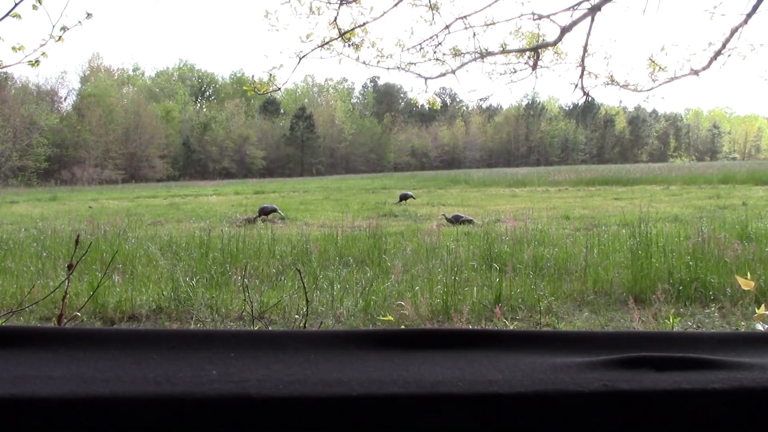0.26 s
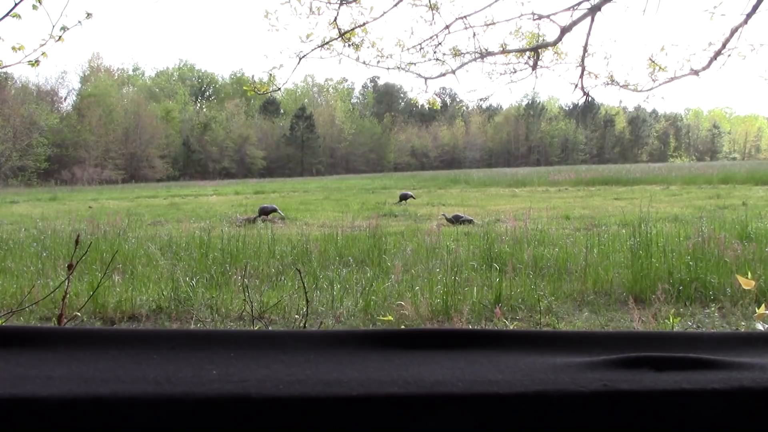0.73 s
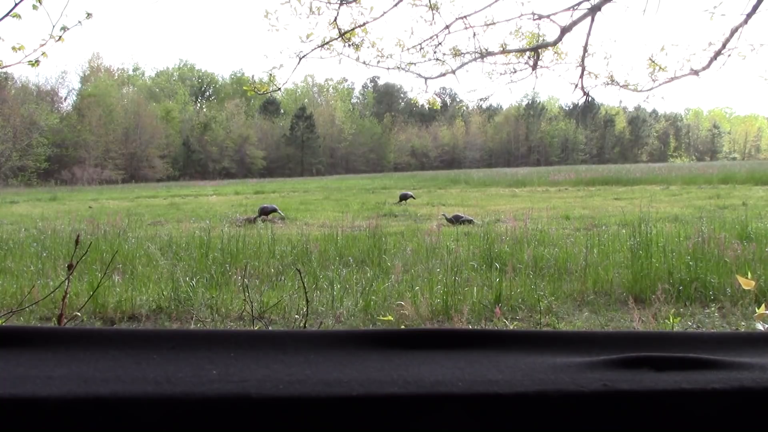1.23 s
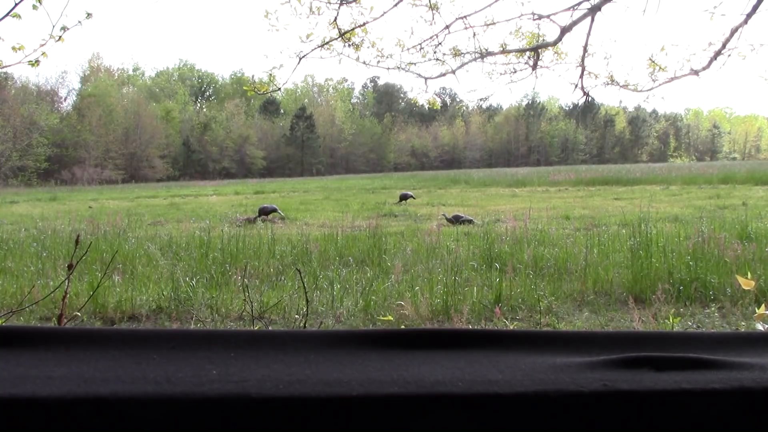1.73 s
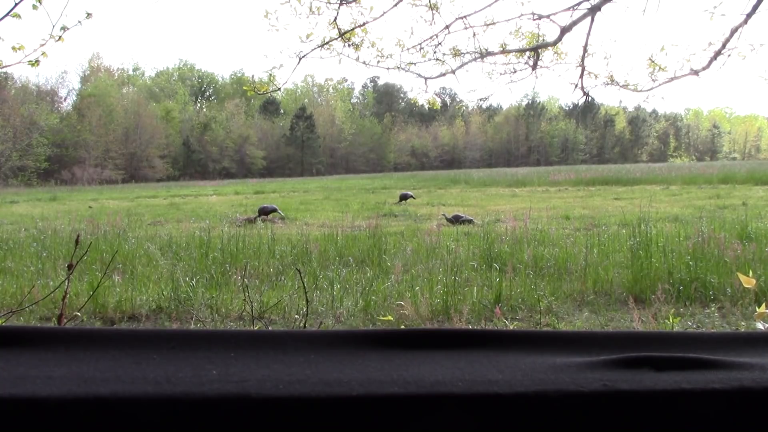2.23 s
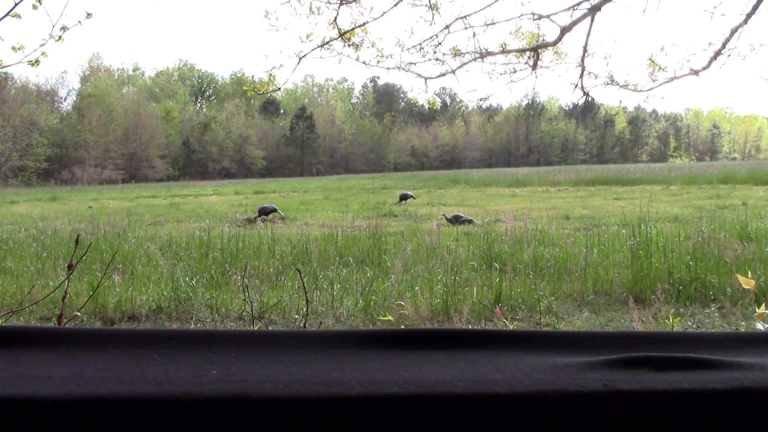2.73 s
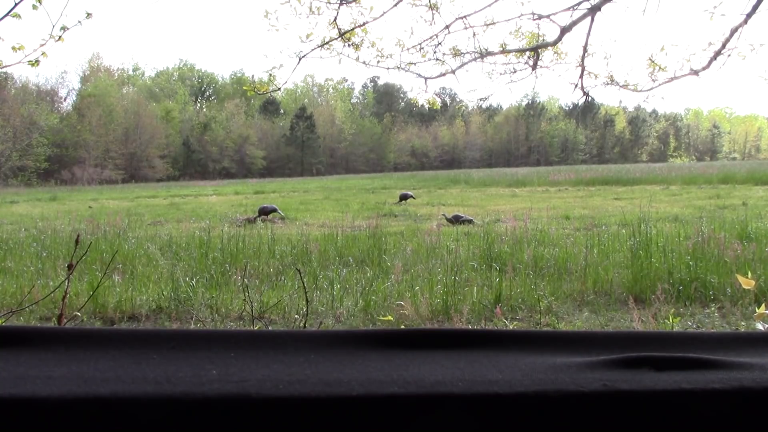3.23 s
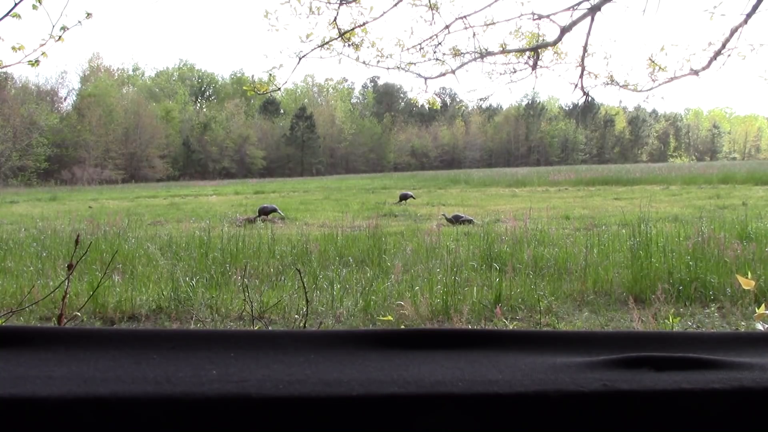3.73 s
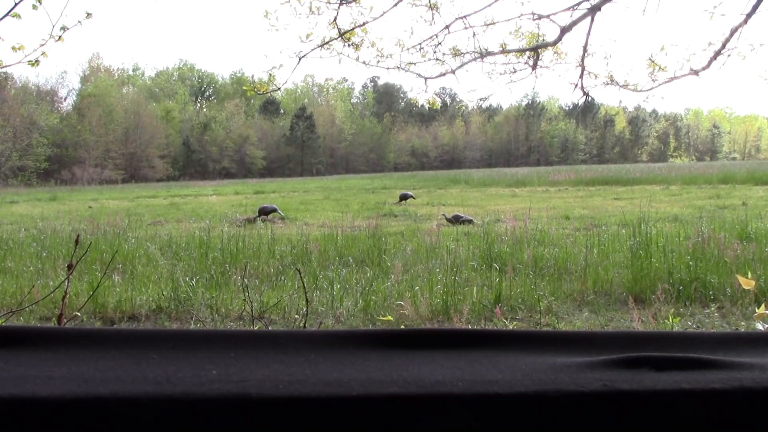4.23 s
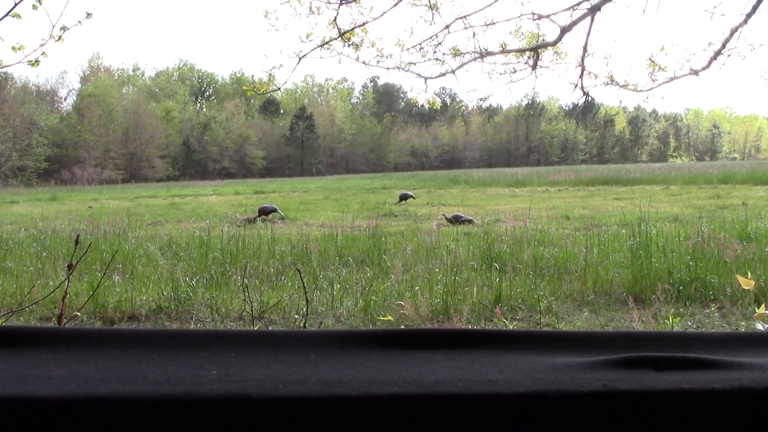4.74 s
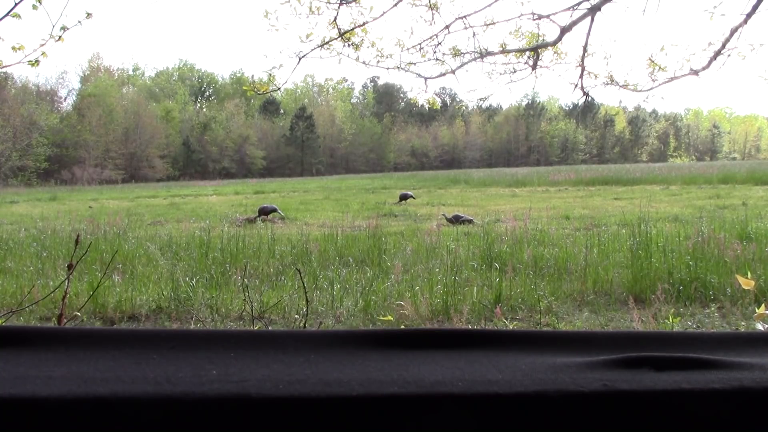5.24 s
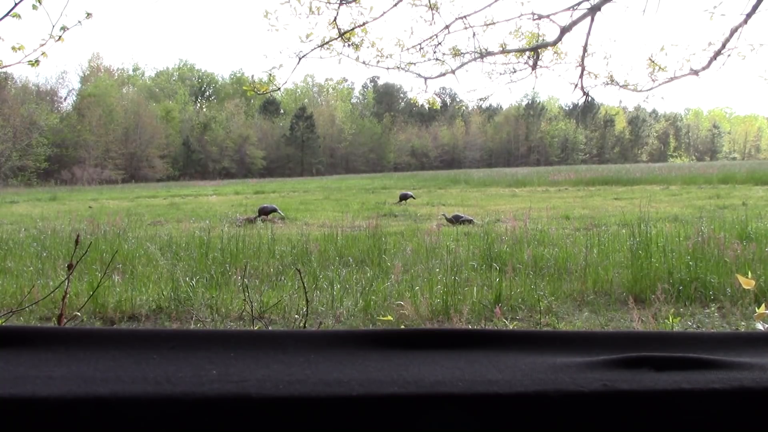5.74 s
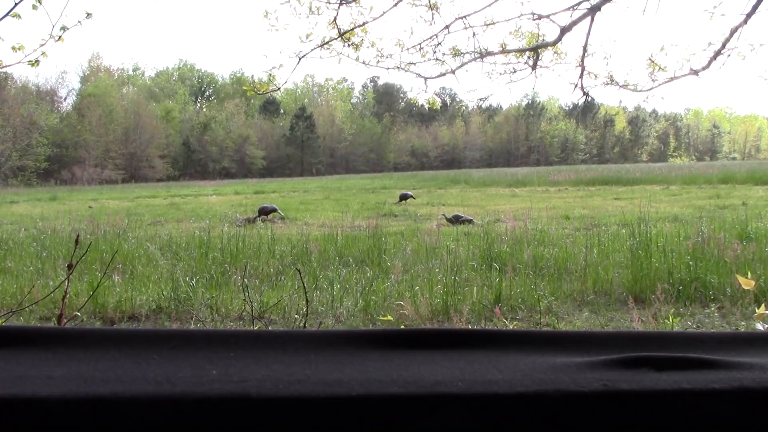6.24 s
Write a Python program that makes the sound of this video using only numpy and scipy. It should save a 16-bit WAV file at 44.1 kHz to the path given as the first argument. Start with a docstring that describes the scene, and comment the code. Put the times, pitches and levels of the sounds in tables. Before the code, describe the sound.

A wild turkey gives sparse, sharp, throaty yelps and a few clucks near a parked car, over faint field hiss and a thin insect buzz.

```python
"""A turkey yelps, peeps and clucks close to a parked car at the edge of a field.
Its voice is harmonics and breath through throat resonances, its clucks paired snaps of ringing modes.
Each yelp dips in pitch onto the main resonance and rises again; the cabin rings and the tree line answers.
A far woodpecker drums one slowing roll of struck wood; a katydid buzzes throughout, scraper over toothed file.
Faint ringing ticks and a filtered-noise hiss fill the field."""
import sys
import numpy as np
from scipy import signal
from scipy.fft import rfft, irfft
from scipy.io import wavfile

SR = 44100
rng = np.random.default_rng(int(sys.argv[2]) if len(sys.argv) > 2 else 0)


def master_out(mix):
    """Clip the mix to full scale and print it as 16-bit PCM to the path in sys.argv[1]."""
    frames = np.transpose(np.atleast_2d(mix))
    ceiling = np.clip(frames, -1, 1)
    pcm = np.round(ceiling * 32767).astype(np.int16)
    wavfile.write(sys.argv[1], SR, pcm)


N = 285327
TIME = np.arange(N) / SR


def turkey(second_snap_s=0.0052):
    """Yelps and peeps from the voice, and clucks made of two quick snaps."""
    # Each row: start in s, length in s, middle of the pitch dip as share of the length, dip length in s,
    # lowest pitch in Hz, peak effort in dB, base brightness in dB per harmonic above the third, rasp in dB.
    yelp_rows = [(0.564, 0.067, 0.57, 0.04, 667, -19, -0.05, 0.5),
                 (1.716, 0.065, .455, 0.04, 623, -11.8, 0.55, 5),
                 (2.2298, 0.07, 0.52, 0.044, 623.5, -14.5, 0.5, 5),
                 (3.758, 0.072, .5, 0.038, 626.4, -17, 0.46, 1.5),
                 (5.4792, .071, .44, .033, 619.4, -13.8, -0.8, 3),
                 (5.862, 0.08, .455, .043, 610.6, -9, 0.18, 0)]
    # Each row: start in s, length in s, mid pitch in Hz, glide over the note in Hz, peak effort in dB,
    # place of the peak as share of the length.
    peep_rows = [(1.209, 0.023, 602, -15, -36.5, .56), (1.377, 0.026, 597.5, -42, -47, 0.46),
                 (1.397, 0.029, 595, 45, -46, .52), (3.013, 0.039, 553, -42, -43.5, 0.33),
                 (3.072, 0.034, 562, -10, -50, .35), (3.100, 0.018, 590, 48, -40.5, 0.58),
                 (5.316, .022, 588, -11.5, -57.5, .4)]
    # Snap pairs. Each row: start in s, level in dB before the high-pass.
    cluck_rows = [(0.1212, -21), (2.4102, -33), (6.386, -47)]
    # Modes of a snap. Each row: frequency in Hz, relative level in dB, t60 in s.
    cluck_modes = [(1104, -5.5, .025), (1218, 8, 0.027), (1396, 2.5, 0.02), (1670, -13, 0.078),
                   (2210, -5, 0.011), (2393, -11, 0.022), (3050, -17, 0.0099), (4900, -30, .02)]
    voice, snaps = np.zeros(N), np.zeros(N)
    for start_s, *shape in yelp_rows:
        add(voice, start_s, yelp(*shape))
    for start_s, *shape in peep_rows:
        add(voice, start_s, peep(*shape))
    for start_s, db in cluck_rows:
        add(snaps, start_s, amp(db) * ring(cluck_modes, rise_s=0.0011))
        add(snaps, start_s + second_snap_s, amp(db) * ring(cluck_modes, rise_s=0.0014))
    return voice + above(snaps, edge_hz=720)


def yelp(length_s, middle, dip_s, low_hz, peak_db, bright_db, rough_db):
    """Quick attack, flat-bottomed pitch dip where the voice is loudest, a break upward and a release."""
    attack_s, release_s = 0.0105, 0.013
    dip_steepness, swell_steepness = 3.38, 2.5
    open_ratio, close_ratio = 1.125, 1.17  # times low_hz
    open_db, close_db = -29.5, -22.5
    edge_dull_db = -1.5  # per harmonic above the second, at the very ends
    t = np.arange(0, length_s, 1 / SR)
    away = abs(t - middle * length_s) / (dip_s / 2)
    dip = 0.5 ** (away ** dip_steepness)
    swell = 0.5 ** (away ** swell_steepness)
    edge_ratio = np.interp(t, [0, length_s], [open_ratio, close_ratio])
    edge_db = np.interp(t, [0, length_s], [open_db, close_db])
    hz = low_hz * (dip + (1 - dip) * edge_ratio)
    effort_db = swell * peak_db + (1 - swell) * edge_db
    gate = np.minimum(t / attack_s, 1) * np.minimum((length_s - t) / release_s, 1)
    sound = voiced(hz, effort_db, bright_db, edge_dull_db * (1 - gate), rough_db)
    return sound * np.sin(np.pi / 2 * gate) ** 2


def peep(length_s, pitch_hz, glide_hz, peak_db, peak_at, fade_db=-13.5):
    """Quiet, dull, unsteady note on one short glide, fade_db below its peak effort at both ends."""
    share = np.linspace(0, 1, round(length_s * SR))
    hz = pitch_hz + glide_hz * (share - 0.5)
    effort_db = peak_db + fade_db * np.interp(share, [0, peak_at, 1], [1, 0, 1]) ** 1.5
    return voiced(hz, effort_db, bright_db=0.5, dull_db=-8.0, rough_db=7.5, jitter=0.014, shimmer=0.15)


def voiced(hz, effort_db, bright_db, dull_db, rough_db, jitter=0.008, loose_jitter=0.005,
           shimmer=0.079, loose_shimmer=0.38, rasp_db=-28, breathy_db=-43, effort_tilt=0.08):
    """Harmonics slide through the throat; clean on the main resonance, rattling when pitched above it."""
    # Breath hiss colour. Each row: frequency in Hz, relative level in dB.
    breath_colour = [(300, -33), (800, -8.5), (2000, -2), (3100, -4), (3900, -13.5), (5000, -4.5),
                     (6200, -13.5), (7000, -21.5), (8000, -22), (11000, -38.5)]
    size = len(hz)
    loose = np.clip((hz - 635) / 65, 0, 1)
    unsteady_hz = hz * (1 + (jitter + loose_jitter * loose) * wander(size, 470))
    turns = np.cumsum(unsteady_hz) / SR

    orders = np.arange(1, 15)[:, None]
    tilt_db = bright_db + effort_tilt * (np.maximum(effort_db, -24) + 10.5)  # effort brightens the voice
    slope_db = tilt_db * np.maximum(orders - 3, 0) + dull_db * np.maximum(orders - 2, 0)
    heights = throat(orders * hz) * amp(slope_db)
    harmonics = (heights * np.sin(2 * np.pi * orders * turns)).sum(0)
    voice = harmonics * np.sqrt(2) / np.linalg.norm(heights, axis=0)

    puffs = rng.standard_normal(size) * (1 + 0.7 * np.cos(2 * np.pi * turns))  # breath pulsing at the pitch
    rattle = 1 + 2.1 * loose
    rasp = amp(rasp_db) * evened(shaped(puffs, throat)) * rattle
    breath = evened(shaped(puffs, lambda f: amp(read(breath_colour, f))))
    hiss = amp(breathy_db + dull_db) * breath * rattle
    flutter = 1 + (shimmer + loose_shimmer * loose) * wander(size, 130)
    sound = (voice + amp(rough_db) * (rasp + hiss)) * flutter
    return sound * amp(effort_db) * signal.windows.tukey(size, 0.1)


def throat(hz, floor_db=-70.5):
    """Gain of the throat: steep-sided resonances over a floor."""
    # Each row: frequency in Hz, full width at half gain in Hz, peak level in dB.
    resonances = [(720, 261, -27.5), (1236, 170, -2.5), (1403, 230, -5.5), (1684, 150, -27.5),
                  (2016, 280, -16.5), (2470, 190, -8.5), (2860, 200, -28), (3115, 250, -25),
                  (3720, 470, -42), (4564, 330, -40), (4975, 250, -32), (5640, 870, -47), (7550, 900, -58)]
    gain = amp(floor_db)
    for f, width_hz, db in resonances:
        gain = gain + amp(db) / (1 + ((hz - f) / (0.78 * width_hz)) ** 2) ** 2
    return gain


def surroundings(x, cabin_db=-16.0, cabin_t60_s=0.075, cabin_edge_hz=2200, trees_db=-41,
                 smear_hz=200, smear=1.2):
    """Glass reflections, the cabin's modes and short ring, and the faint, blurred answer of the trees."""
    # Reflections inside the car. Each row: delay in s, level in dB.
    panes = [(.0056, -15), (0.0102, -20), (0.0235, -27.5)]
    # Lingering cabin modes. Each row: frequency in Hz, level in dB, t60 in s.
    cabin_modes = [(1477, -3, 0.025), (1215, -24, 0.19)]
    # Side the turkey stands on. Each row: frequency in Hz, left minus right in dB.
    lean = [(600, 0), (1300, -0.8), (2500, 0.7), (5000, 4)]
    # Phase between the microphone ports. Each row: frequency in Hz, left lead in radians.
    lead = [(0, 0), (3270, 0.28), (3620, 0.0), (4650, 0.3), (5000, 0.2), (6200, 0.2), (6460, -0.0032),
            (7580, 0.3), (8870, -0.1), (9560, 0.0), (13300, -0.0), (13600, 0.1), (15200, -0.0)]
    # Colour of the sound sent to the trees. Each row: frequency in Hz, level in dB.
    outward_colour = [(600, -3.5), (1250, 4), (2000, 0.5), (2500, 2), (4000, 7.5), (7000, 7.5)]

    near, t = x.copy(), np.arange(8000) / SR
    for delay_s, db in panes:
        add(near, delay_s, amp(db) * x)
    for hz, db, t60_s in cabin_modes:
        decay = amp(-60 * t / t60_s)
        mode = 2 * decay / decay.sum() * np.cos(2 * np.pi * hz * t)
        add(near, 0.009, amp(db) * signal.oaconvolve(x, mode))

    muffled = shaped(x, lambda f: 1 / (1 + (f / cabin_edge_hz) ** 2))  # upholstery soaks up the treble
    # the first 5 ms are held 40 dB down
    cabin = echoes(muffled, lambda t: -60 * t / cabin_t60_s - 40 * (t < 0.005), size=8000)
    outward = shaped(x, lambda f: amp(read(outward_colour, f)))
    blurred = evened(1 + smear * wander(N, smear_hz)) * outward
    trees = echoes(blurred, field_echo_db, size=26000)

    left, right = near + amp(cabin_db) * cabin + amp(trees_db) * trees
    port = lambda f: amp(read(lean, f) / 2) * np.exp(0.5j * read(lead, f))
    return np.array([shaped(left, port), shaped(right, lambda f: 1 / port(f))])


def field_echo_db(t, rise_s=0.018):
    """Echo strength by delay: fading scatter from the grass plus one broad return from the tree line."""
    grass_t60_s = 0.9
    tree_line_s, tree_spread_s, tree_line_db = 0.15, 0.072, -6
    grass = np.minimum(t / rise_s, 1) * amp(-60 * t / grass_t60_s)
    tree_line = amp(tree_line_db) * np.exp(-((t - tree_line_s) / tree_spread_s) ** 2)
    return 20 * np.log10(grass + tree_line + 1e-9)


def woodpecker(count=23, uneven_db=0.2, wood_db=-7, wood_t60_s=0.56):
    """A slowing roll of beak blows on a far trunk, with the wood's reverberation."""
    # Trunk modes. Each row: frequency in Hz, relative level in dB, t60 in s.
    trunk = [(959, 18, 0.0074), (1556, -8.5, 0.019), (1900, -12, 0.022)]
    start_s, gap_s, slowing_s = 3.8865, 0.04012, 0.000246  # slowing_s: growth per gap
    middle_db, ends_db = -39.6, -2.8  # ends_db: relative to the middle of the roll
    blows, knock = np.zeros(N), ring(trunk, rise_s=0.0027)
    for k, chance in enumerate(rng.standard_normal(count)):
        blow_s = start_s + k * gap_s + slowing_s * k ** 2 / 2
        db = middle_db + ends_db * (2 * k / (count - 1) - 1) ** 2 + uneven_db * chance
        add(blows, blow_s, amp(db) * knock)
    blows = above(blows, edge_hz=500)
    return blows + amp(wood_db) * echoes(blows, lambda t: -60 * t / wood_t60_s, size=26000)


def katydid(level_db=-58.0, wing_hz=58.5013, scrape_db=-3, scatter_db=-6, tooth_jitter=0.015):
    """Each wing stroke drags a scraper over a file, speeding up and slowing; grass scatters the buzz."""
    # One wing cycle. Each row: share of the cycle, tooth rate in Hz, relative level in dB.
    wing = [(0, 9096, -5), (.22, 8860, -11.5), (.33, 9295, 1), (0.431, 9693, -2), (.54, 9730, -2.5),
            (.68, 9530, 0), (.8, 8690, -8), (1, 9104, -9.5)]
    # Wing colour. Each row: frequency in Hz, relative level in dB.
    wing_colour = [(6000, -24), (7700, -10), (8400, 1), (8830, 0.5), (9100, -4.5), (9400, -2), (9700, -1),
                   (9950, 0), (10400, -12.5), (11500, -32)]
    share, tooth_hz, stroke_db = np.transpose(wing)
    cycle = (TIME * wing_hz + 0.023 * wander(N, 20)) % 1
    hz = np.interp(cycle, share, tooth_hz) * (1 + tooth_jitter * wander(N, 1500))
    teeth = np.sin(2 * np.pi * np.cumsum(hz) / SR)
    scraped = teeth + amp(scrape_db) * rng.standard_normal(N)
    buzz = scraped * amp(np.interp(cycle, share, stroke_db) + 1.0 * wander(N, 400))
    buzz = evened(shaped(buzz, lambda f: amp(read(wing_colour, f)) * (f > 5000)))
    scatter = echoes(buzz, lambda t: -60 * t / 0.061, size=4000, apart=0.37)
    return amp(level_db) * evened(placed(buzz, left_db=-1.1) + amp(scatter_db) * scatter)


def ticking(level_db=-52, per_s=20.0, spread_db=3):
    """Faint, uneven, dry ticks: short dying modes at jittered intervals."""
    # Each row: frequency in Hz, relative level in dB, t60 in s.
    modes = [(1495, 4.5, 0.013), (1920, -0.5, 0.02), (2200, -5.5, 0.027),
             (2721, -3, 0.015), (4500, -14.5, 0.008), (5570, -20, 0.057)]
    out, tick = np.zeros(N), ring(modes, rise_s=0.001)
    for k, (late, size) in enumerate(rng.standard_normal((190, 2))):
        db = level_db + spread_db * min(size, 1.5)
        add(out, (k + 0.1 * late) / per_s, amp(db) * tick)
    return out


def air(level_db=-58.5, swell_db=0.09):
    """Steady hiss and low murmur of the open field: coloured noise, partly alike left and right."""
    # Each row: frequency in Hz, relative spectral level in dB.
    colour = [(20, -20), (50, -9.5), (70, 0), (110, 2.5), (160, 0), (400, 1), (800, -1.5), (1200, -7),
              (1900, -8), (3300, -15), (4600, -13), (6500, -20), (11000, -25.5), (15500, -30.5)]
    # Each row: frequency in Hz, left-right correlation.
    likeness = [(30, .8), (60, .94), (130, 0.68), (290, 0.69), (640, 0.45), (1400, 0.83), (3100, 0.72),
                (7000, .84), (11000, 1)]
    a, b = rng.standard_normal((2, N))
    same = lambda f: np.clip(read(likeness, f), 0, 1)
    mid = shaped(a, lambda f: np.sqrt(1 + same(f)))
    side = shaped(b, lambda f: np.sqrt(1 - same(f)))
    pair = shaped(np.array([mid + side, mid - side]), lambda f: amp(read(colour, f)))
    return evened(pair) * amp(level_db + swell_db * wander(N, 4))


def ring(modes, rise_s, size=4000):
    """The dying modes of a struck thing after a soft onset, peak 1."""
    t = np.arange(size) / SR
    out = sum(amp(db - 60 * t / t60_s) * np.sin(2 * np.pi * hz * t) for hz, db, t60_s in modes)
    out = out * (1 - np.exp(-(t / rise_s) ** 2))
    return out / abs(out).max()


def echoes(x, decay_db, size, apart=0.23):
    """Dense random reflections under a decay curve, partly alike in both channels."""
    taps = rng.standard_normal((3, size)) * amp(decay_db(np.arange(size) / SR))
    taps = taps[:2] * apart + taps[2]
    return signal.fftconvolve(x[None], taps / np.linalg.norm(taps[0]), axes=1)[:, :N]


def placed(x, left_db):
    """Two channels, the left louder by left_db."""
    return np.array([x * amp(left_db / 2), x * amp(-left_db / 2)])


def add(mix, start_s, sound):
    """Mixes a sound in at start_s."""
    part = mix[max(round(start_s * SR), 0):][:len(sound)]
    part += sound[:len(part)]


def wander(size, hz):
    """Smooth random signal of rms 1, Gaussian spectrum falling to 1/e at hz."""
    return evened(shaped(rng.standard_normal(size), lambda f: np.exp(-(f / hz) ** 2)))


def above(x, edge_hz):
    """Steep high-pass, half gain near edge_hz."""
    return shaped(x, lambda f: 1 / (1 + (edge_hz / (f + 1)) ** 8))


def shaped(x, gain):
    """Filters x by a gain that is a function of frequency."""
    size = x.shape[-1] + 2048
    spectrum = rfft(x, size) * gain(np.fft.rfftfreq(size, 1 / SR))
    return irfft(spectrum, size)[..., :x.shape[-1]]


def read(points, hz):
    """Interpolates a table on a log-frequency axis."""
    f, value = np.transpose(points)
    return np.interp(np.log(hz + 1), np.log(f + 1), value)


def evened(x):
    """Scales to rms 1."""
    return x / np.sqrt(np.mean(x ** 2) + 1e-20)


def amp(db):
    """Decibels to gain."""
    return 10 ** (np.asarray(db) / 20)


def scene():
    """The turkey in front of the field's small sounds."""
    return surroundings(turkey()) + woodpecker() + katydid() + ticking() + air()


def record(dry, edge_hz=15700):
    """The recorder's band limit: a linear-phase low-pass."""
    lowpass = signal.firwin(511, edge_hz, window=("kaiser", 9), fs=SR)
    return signal.oaconvolve(dry, lowpass[None], "same")


dry = scene()
out = record(dry)
master_out(out)
```